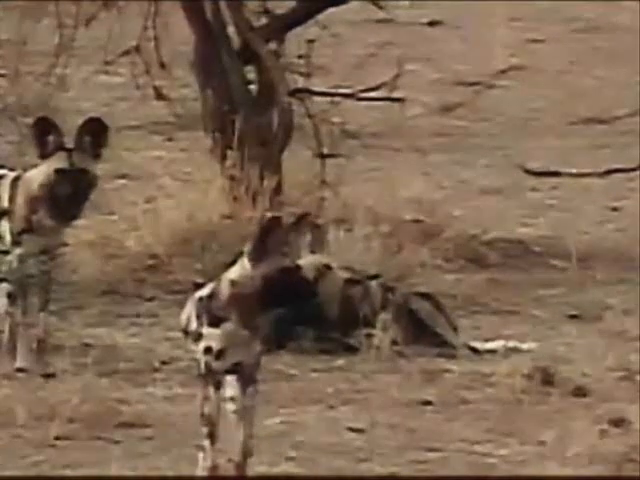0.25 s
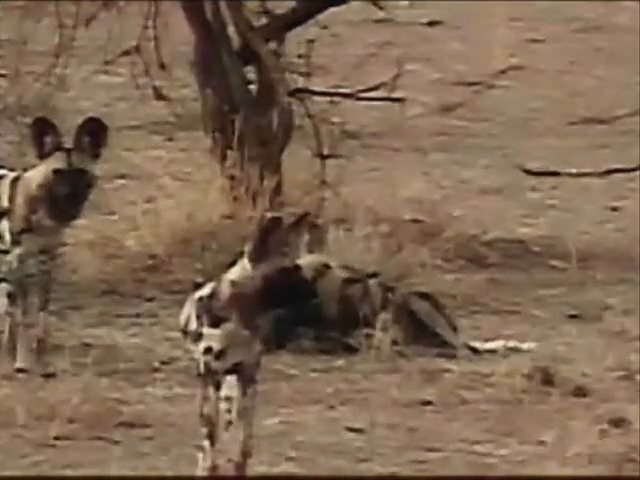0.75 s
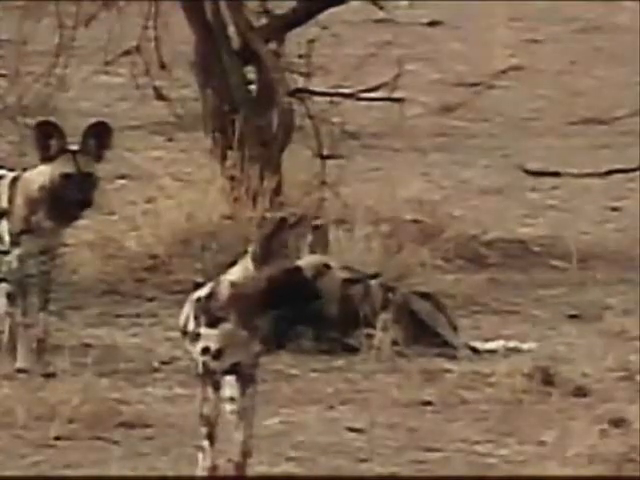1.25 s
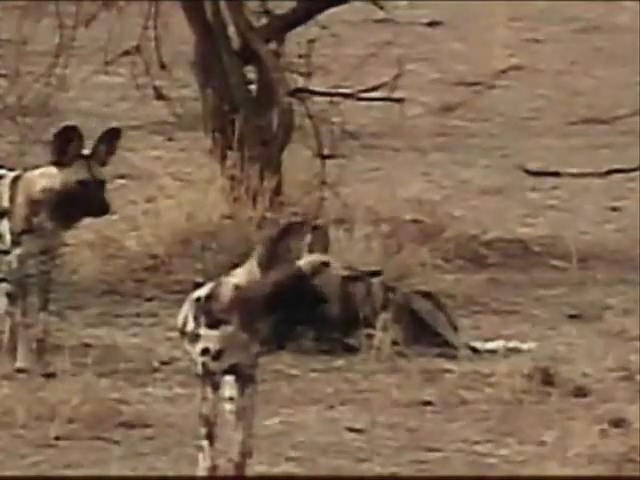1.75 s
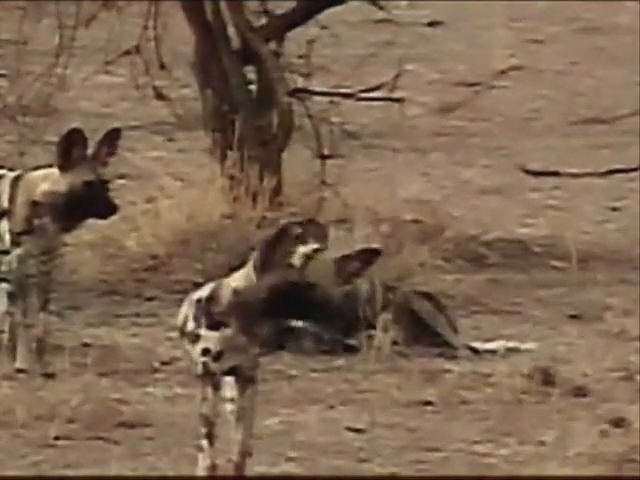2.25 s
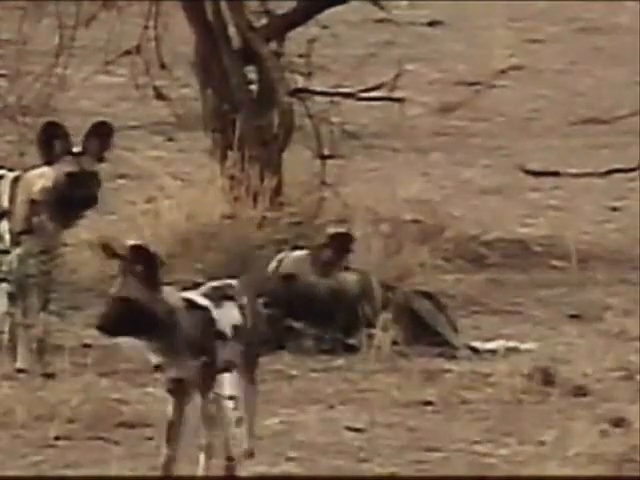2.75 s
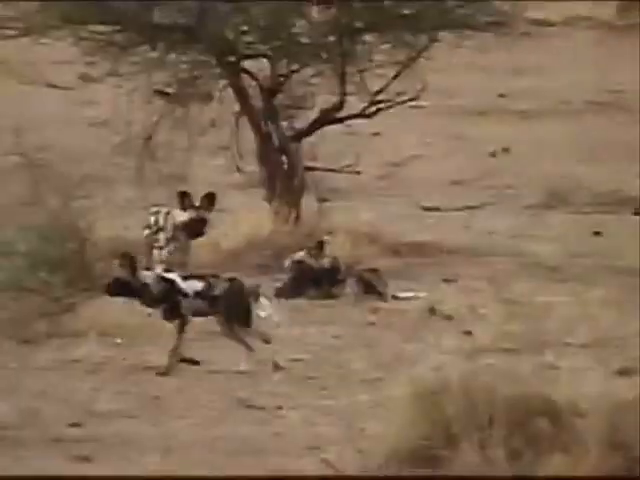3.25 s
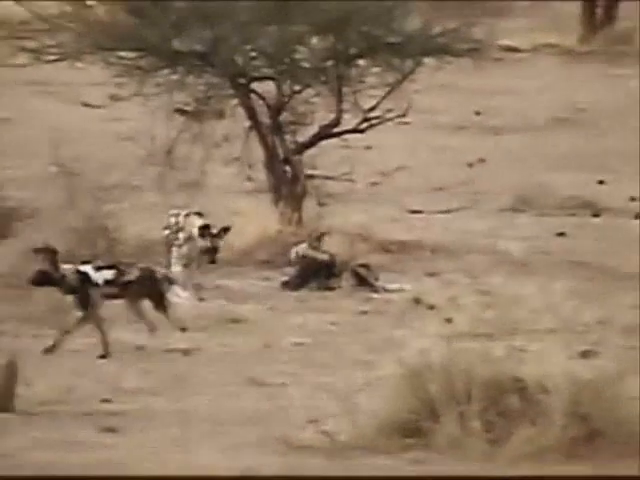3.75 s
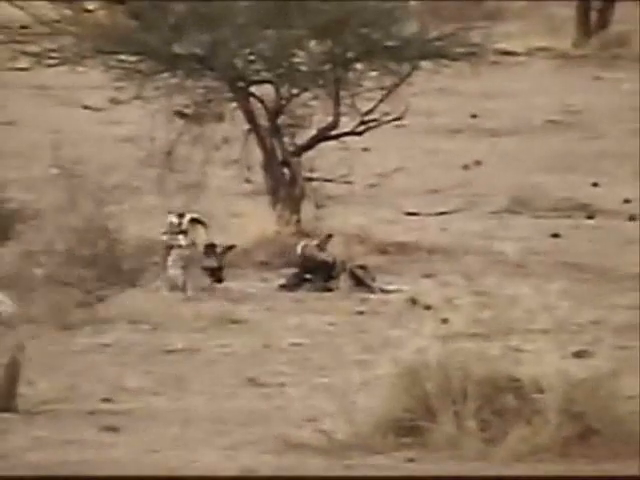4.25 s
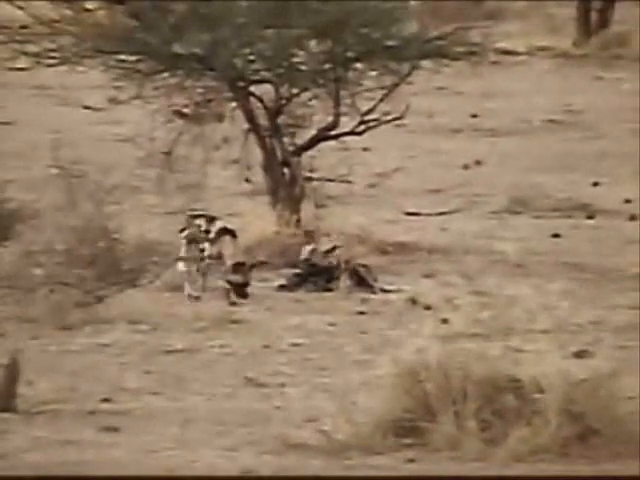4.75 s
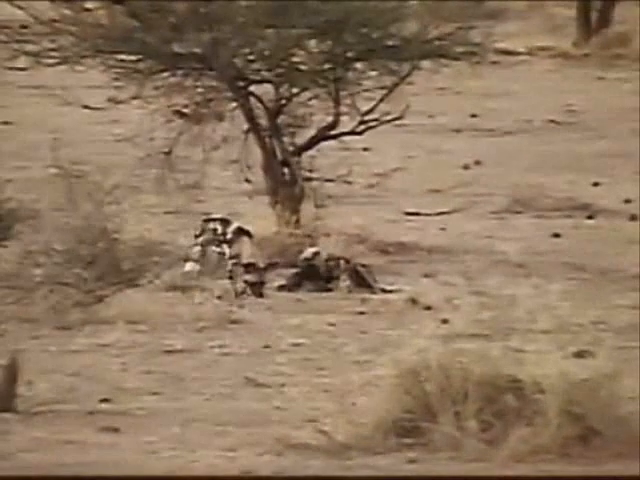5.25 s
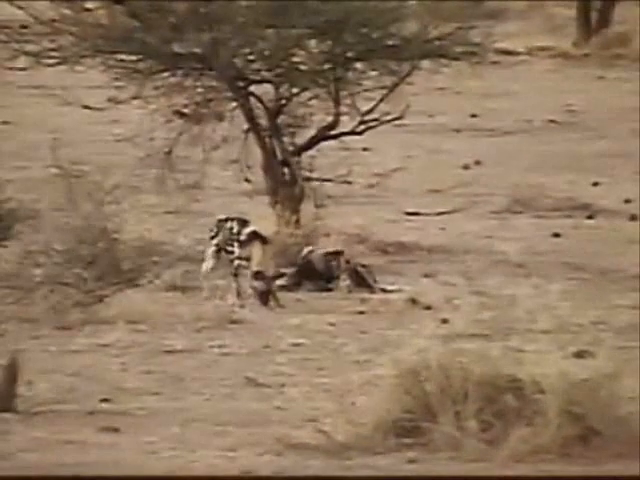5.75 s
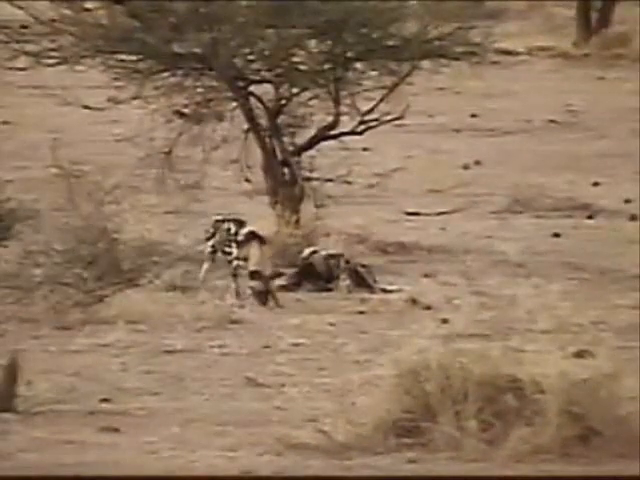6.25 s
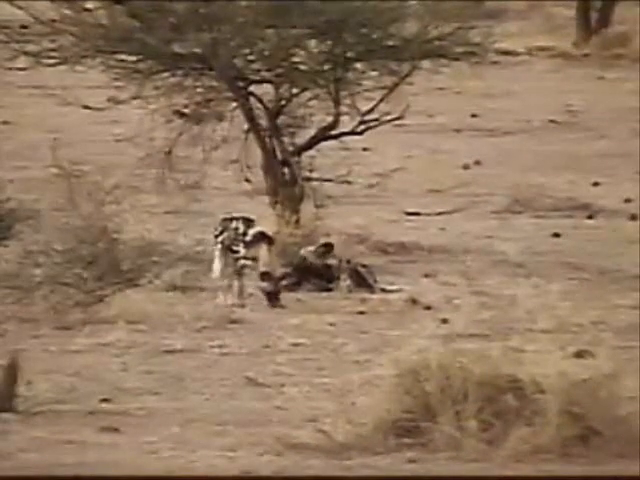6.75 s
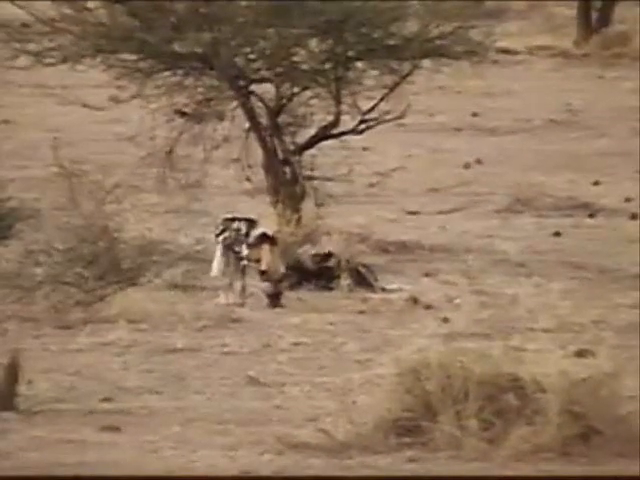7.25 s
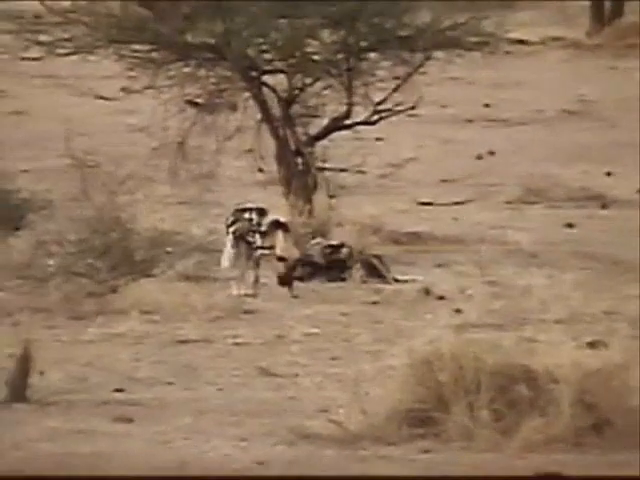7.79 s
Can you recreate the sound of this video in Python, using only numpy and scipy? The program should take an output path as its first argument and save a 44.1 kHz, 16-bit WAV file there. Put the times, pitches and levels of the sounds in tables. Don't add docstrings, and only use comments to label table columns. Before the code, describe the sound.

High-pitched yips, gliding whistles and even chipping from a wild dog pack, loud and slightly distorted at peaks, thinning to faint calls in wind.

```python
import sys
import numpy as np
from scipy import signal
from scipy.fft import rfft, irfft, next_fast_len
from scipy.io import wavfile
from scipy.ndimage import uniform_filter1d, minimum_filter1d, map_coordinates

SR = 44100
rng = np.random.default_rng(int(sys.argv[2]) if len(sys.argv) > 2 else 0)


def digitize_waveform(pressure):
    field = np.atleast_2d(pressure).T
    bounded = np.clip(field, -1, 1)
    quanta = np.round(bounded * 32767).astype(np.int16)
    wavfile.write(sys.argv[1], SR, quanta)


def boost_factor(decibels):
    exponent = np.asarray(decibels, float) / 20
    return 10 ** exponent


N = 353682
T = np.arange(N) / SR

# middle [t/s], start [f/Hz], end [f/Hz], peak [level/dB]
YIPS = [(0.187, 1830, 1910, -27), (.207, 2060, 2480, -20.5), (.293, 2480, 2540, -13),
        (.314, 2605, 2475, -14.5), (0.819, 2006, 2720, -18.5), (1.12, 2130, 2870, -20.5),
        (.824, 1645, 1690, -13), (1.188, 2175, 2160, -13.5), (1.113, 1775, 2240, -20.5),
        (1.206, 2215, 2270, -16), (1.27, 1674, 2010, -19.5), (1.727, 2820, 3070, -28),
        (1.859, 1920, 1960, -17.5), (1.89, 2010, 2100, -17), (2.933, 2454, 3260, -21.5),
        (2.957, 1533, 1770, -19.5), (5.011, 1534, 1760, -11), (5.07, 2043, 2310, -6.5),
        (1.541, 2740, 2820, -6), (5.411, 2490, 2660, -13), (5.969, 1894, 1850, -16),
        (6.073, 2380, 2600, -24), (7.657, 1820, 2200, -32.5)]
# middle [t/s], start [f/Hz], end [f/Hz], peak [level/dB]
PIPS = [(1.076, 1580, 1640, -18), (1.086, 1604, 1660, -13.5), (1.095, 1690, 1720, -13),
        (1.124, 2590, 2836, -11), (1.181, 2567, 2550, -5.5), (1.187, 2610, 2540, -6.5),
        (1.197, 2535, 2540, -7), (1.203, 2555, 2480, -10), (1.21, 2475, 2440, -17.5),
        (3.215, 1543, 1694, -7), (3.2445, 2612, 2683, -3.5), (3.2518, 2655, 2600, -8),
        (3.263, 2653, 2560, 0), (3.269, 2535, 2394, -6.5), (1.897, 2802, 2733, -3),
        (3.5745, 2438, 2626, -3.5), (4.411, 2645, 2870, -16), (5.038, 2683, 2704, -7.5),
        (5.0475, 2718, 2750, -2), (5.061, 2672, 2624, -1), (5.968, 1850, 1870, -28.5)]
# middle [t/s], start [f/Hz], end [f/Hz], peak [level/dB]
TWITTERS = [(.455, 1630, 1505, -35.5), (.84, 1620, 1650, -26), (1.164, 1790, 2440, -15.5),
            (1.514, 2880, 2746, -13), (1.544, 2592, 3140, -9.5), (1.879, 2170, 2670, -9.5),
            (1.899, 2926, 2514, -12), (1.913, 2432, 2250, -14.5), (2.035, 2580, 2476, -18.5),
            (2.047, 2810, 2740, -22.5), (2.252, 2950, 3167, -15), (2.307, 2110, 1778, -18.5),
            (2.787, 1860, 1730, -22.5), (3.137, 1496, 1580, -22.5), (3.234, 1727, 2540, -11.5),
            (3.222, 1516, 1900, -10.5), (3.545, 1860, 2170, -24.5), (3.63, 1934, 1457, -31.5),
            (4.411, 2580, 3025, -19.5), (4.424, 2000, 2435, -23.5), (4.737, 2425, 2930, -22.5),
            (4.797, 2470, 2675, -8), (4.927, 2536, 2610, -18), (5.202, 2700, 2240, -25),
            (5.027, 1833, 2274, -21.5), (5.286, 2710, 2700, -22), (5.493, 2924, 2610, -28.5),
            (7.866, 2508, 3030, -28), (7.92, 1480, 1680, -23.5), (7.95, 2297, 2280, -26)]
# middle [t/s], start [f/Hz], end [f/Hz], peak [level/dB]
SQUEALS = [(.4, 1076, 1260, -44), (1.39, 1946, 2120, -31), (7.803, 2600, 2340, -32),
           (.428, 2558, 2560, -30), (1.533, 2279, 2817, -9), (1.79, 1850, 2025, -30.5),
           (2.276, 3020, 2508, 0.5), (2.292, 2790, 2043, -11), (2.472, 2680, 3120, -27.5),
           (2.733, 2696, 2475, -23.5), (2.829, 1582, 1614, -21.5), (2.939, 2520, 2860, -18),
           (3.113, 1687, 1698, -12), (3.173, 2438, 3225, -13), (3.275, 2017, 2580, -20),
           (3.505, 2390, 2920, -25.5), (4.765, 1230, 1790, -26), (4.813, 2410, 2400, -39),
           (5.43, 2600, 2483, -24.5), (6.073, 1530, 1583, -25.5), (6.19, 1678, 2376, -26),
           (7.148, 1574, 1660, -30.5)]
# middle [t/s], length [t/s], start [f/Hz], end [f/Hz], peak [level/dB]
WHINES = [(1.082, .1, 1500, 1800, -14), (1.14, .05, 1608, 1910, -23), (2.429, .08, 2820, 2800, -23),
          (2.982, 0.072, 1750, 2980, -26), (4.398, .05, 1490, 2060, -36), (5.045, 0.1, 2660, 3510, -24.5),
          (3.575, .06, 2852, 2804, -11), (4.322, .07, 1746, 2027, -30), (5.053, .08, 2647, 2483, -16.5),
          (4.693, 0.1, 818, 1100, -50), (3.53, 0.055, 2600, 2820, -26), (3.59, .037, 2654, 2998, -4),
          (6.186, .08, 1830, 2653, -33), (7.638, .08, 2370, 2670, -27), (7.694, .09, 3010, 2585, -30.5),
          (7.907, .08, 2770, 2770, -30.5), (7.956, .06, 2450, 2640, -24.5)]
# middle [t/s], start [f/Hz], end [f/Hz], peak [level/dB]
ANSWERS_EARLY = [(0.162, 2096, 1808, -34), (0.225, 2754, 2630, -26), (0.235, 2611, 2200, -28),
                 (0.365, 1730, 1610, -32), (0.427, 2583, 2620, -28.5), (0.475, 1686, 1590, -35.5),
                 (0.551, 2940, 2840, -28), (0.595, 3080, 2710, -33), (0.868, 2780, 2540, -36),
                 (0.888, 2660, 2570, -31), (0.976, 1660, 1680, -30), (1.145, 2710, 2860, -28),
                 (1.222, 2486, 2590, -20.5), (1.291, 2740, 2760, -27.5), (1.473, 3060, 2710, -33),
                 (1.676, 3050, 2685, -35), (1.7, 2940, 2810, -28), (1.764, 2860, 2842, -41),
                 (1.824, 1910, 1900, -34.5), (2.339, 2810, 2740, -14), (2.395, 2754, 2890, -23.5),
                 (2.464, 1630, 1620, -33), (2.694, 2820, 2630, -29), (2.738, 1364, 1722, -35),
                 (2.766, 2570, 3020, -29), (2.786, 2970, 2650, -32), (2.917, 1960, 2010, -29.5),
                 (2.995, 2445, 2485, -24), (3.013, 1720, 1750, -35), (3.075, 2635, 2540, -32),
                 (3.081, 1503, 1690, -27), (3.157, 2035, 2000, -24), (3.177, 1630, 1560, -17),
                 (3.203, 2493, 2890, -15), (3.3, 2570, 2710, -27), (3.31, 2520, 2500, -31),
                 (3.336, 2700, 2570, -40), (3.394, 2660, 2583, -35.5), (3.42, 2520, 2583, -33),
                 (3.476, 2440, 2570, -26.5), (3.624, 2310, 2750, -24.5), (3.658, 2810, 2880, -38)]
# middle [t/s], start [f/Hz], end [f/Hz], peak [level/dB]
ANSWERS_LATE = [(3.716, 2936, 2860, -28.5), (3.753, 2806, 2960, -33), (4.075, 2470, 2590, -28.5),
                (4.131, 2670, 2454, -32.5), (4.348, 1780, 2210, -31), (4.376, 2320, 2760, -27),
                (4.475, 2360, 2799, -30), (4.502, 2800, 2655, -36.5), (4.672, 1904, 1925, -35.5),
                (4.727, 2014, 2080, -30), (4.741, 1705, 1630, -28), (4.743, 3090, 2810, -25),
                (4.781, 1840, 2240, -31), (4.903, 2627, 2530, -31.5), (4.986, 1550, 1696, -29),
                (5.107, 2500, 2500, -26), (5.14, 2100, 1870, -24), (5.172, 2650, 2570, -24),
                (5.199, 1683, 1480, -28), (5.22, 2730, 2640, -21.5), (5.274, 2400, 2575, -22),
                (5.326, 2770, 2850, -30.5), (5.34, 2220, 2050, -29), (5.384, 2660, 2552, -20.5),
                (6.098, 2560, 2570, -30), (6.112, 1630, 2260, -42), (6.132, 2554, 2530, -27.5),
                (6.15, 2765, 2836, -30.5), (6.206, 2280, 2470, -31), (6.882, 1833, 2050, -32),
                (6.923, 1830, 1666, -31), (7.024, 1556, 1545, -37), (7.332, 2695, 2550, -31.5),
                (7.394, 1643, 1620, -37.5), (7.593, 2800, 2780, -36.5), (7.595, 2430, 2410, -34.5),
                (7.657, 1980, 2020, -34.5), (7.708, 1960, 1890, -34.5), (7.747, 2420, 2530, -36),
                (7.868, 2184, 2020, -30), (7.892, 1986, 1770, -30), (7.96, 2505, 2540, -25)]
# middle [t/s], peak [level/dB]
CHIP_TRAINS = [(0.117, -30), (0.176, -34), (0.24, -30), (0.31, -27), (0.387, -26), (0.543, -28.5),
               (1.262, -19.5), (1.315, -20.5), (1.382, -23), (1.448, -25), (1.52, -20.5), (1.592, -18.5),
               (1.727, -36), (1.859, -27), (1.928, -28), (2.004, -28.5), (2.077, -27), (2.159, -25),
               (2.239, -29), (2.315, -26), (2.34, -31), (2.887, -27.5), (2.935, -27.5), (3.001, -28.5),
               (3.062, -27.5), (3.131, -25), (3.284, -31), (3.353, -28.5), (3.416, -27), (3.488, -27.5),
               (3.559, -24.5), (3.634, -23), (3.873, -25), (3.935, -22.5), (4.003, -23), (4.075, -24.5),
               (4.148, -19), (4.662, -24), (4.721, -22), (4.757, -32.5), (4.786, -22), (4.853, -18),
               (4.881, -35.5), (4.928, -16), (4.962, -32), (4.997, -20.5), (5.383, -34), (5.494, -30.5),
               (7.258, -32), (7.296, -28), (7.372, -28), (7.411, -25.5), (7.445, -32), (7.542, -23.5),
               (7.614, -20), (7.688, -26)]
# middle [t/s], length [t/s], pitch [f/Hz], peak [level/dB]
SINGLE_CHIPS = [(0.956, .04, 3297, -31), (5.143, .025, 3600, -31.5), (1.794, 0.014, 3663, -34),
                (.467, 0.043, 3584, -19), (0.756, 0.03, 3550, -18.5), (0.825, 0.025, 3330, -8.5),
                (1.666, 0.0047, 3515, -8), (1.673, 0.01, 3486, -12.5), (2.616, 0.037, 3325, -28),
                (2.783, 0.023, 3628, -14.5), (2.847, 0.04, 3556, -16.5), (3.204, .025, 3470, -20.5),
                (3.714, 0.024, 3530, -13), (3.73, .016, 3583, -20.5), (3.766, .016, 3624, -21),
                (3.797, 0.038, 3624, -24.5), (4.615, 0.015, 3557, -14), (5.235, 0.049, 3200, -34.5),
                (6.92, 0.027, 3554, -14.5), (6.938, 0.026, 3580, -30.5), (7.195, 0.016, 3637, -19.5),
                (7.345, .022, 3560, -13), (7.49, 0.033, 3400, -24), (7.491, 0.022, 3600, -23)]
# [t/s], [level/dB]
EXCITEMENT = [(0, -35), (.6, -43), (.8, -35), (.95, -41.5), (1.15, -32), (1.55, -36), (2.4, -41),
              (2.55, -42.5), (2.75, -34), (3.65, -38), (4.55, -42.5), (5.05, -30), (5.5, -35.5), (5.8, -41),
              (6.1, -36.5), (6.25, -43.5), (7.5, -39), (7.62, -39.5)]
# middle [t/s], width [t/s], peak [level/dB]
OUTBURSTS = [(.27, 0.31, -48), (1.15, 0.13, -41.5), (1.75, 0.21, -51.5), (2.4, 0.043, -44.5),
             (2.78, 0.056, -36), (3.22, .14, -35.5), (4.4, 0.047, -37.5), (5.05, 0.22, -34.5),
             (6.15, 0.2, -43), (6.95, 0.35, -54.5), (7.75, 0.13, -43.5)]
# [f/Hz], [level/dB per Hz]
FAR_COLOUR = [(590, -49.5), (1000, -31.5), (1410, -18), (1590, -8), (2020, -7.5), (2290, -9.5),
              (2480, -1.5), (2810, 0.5), (3130, -7), (3490, -4.5), (3690, -8.5), (3850, -21), (3970, -30.5),
              (4120, -72.5), (4300, -78), (5590, -106), (9460, -120)]
# [f/Hz], [level/dB]
OVERTONE_COLOUR = [(3950, -45.5), (4200, -14.5), (4550, -21), (4800, -17.5), (5200, -10), (5600, 1.5),
                   (5950, -4.5), (6400, -25), (7200, -31), (8200, -14.5), (9500, -29.5), (10800, -20.5),
                   (12000, -75.5)]
# [t/s], peak [level/dB], knock [f/Hz]
PAW_TAPS = [(0.626, -57.5, 1250), (2.117, -61.5, 1150), (2.414, -46.5, 1270), (4.708, -52.5, 1010),
            (5.066, -50, 1006), (5.131, -44.5, 1116), (5.198, -49.5, 657), (5.265, -47, 652),
            (5.33, -48.5, 1244), (5.401, -45, 1210), (5.473, -49, 645), (5.528, -53.5, 450),
            (7.775, -54.5, 1160)]
# middle [t/s], width [t/s], [level/dB]
SCUFFLES = [
    (4.97, .05, -63.5),
    (5.38, 0.24, -62),
]
# middle [t/s], width [t/s], panel [level/dB], rumble [level/dB]
GUSTS = [(1.58, 0.09, -51.5, -62.5), (1.771, 0.2, -60.5, -65), (1.97, 0.086, -57.5, -71.5),
         (2.2, 0.15, -47.5, -62), (2.6, .06, -59.5, -66.5), (3.3, 0.18, -79, -73),
         (3.95, 0.096, -61.5, -61.5), (4.8, 0.099, -48.5, -63.5), (5, 0.11, -56.5, -62),
         (5.2, .2, -74.5, -71.5), (5.72, 0.15, -73, -61), (6.2, 0.33, -77, -75), (7.3, .6, -76, -75.5)]
# [f/Hz], [level/dB per Hz]
RUMBLE_COLOUR = [(62, -37.5), (90, -1), (105, -11), (120, 7.5), (135, -10), (160, -3), (250, -13.5),
                 (380, -10), (700, -89)]
# [f/Hz], [level/dB per Hz]
AIR_COLOUR = [(120, -51), (200, -17), (477, -11), (532, -14), (875, -13), (1400, -7), (1500, -7),
              (1950, -28.5), (3300, -120)]
# [f/Hz], [level/dB per Hz]
HISS_COLOUR = [(3900, -13), (4500, -9.5), (5400, -7), (6000, -7.5), (6500, -11), (8000, -16.5),
               (10000, -24), (12000, -59)]
# [t/s], [level/dB]
COO_LEVEL = [(0, -70.5), (.7, -69.5), (.85, -59), (1.6, -77), (5.7, -77.5), (5.8, -55.5), (6, -68),
             (6.9, -72.5), (8.02, -81)]

YIP_S, PIP_S, TWITTER_S, SQUEAL_S, ANSWER_S = .016, .0092, .038, .043, .028
LEAN = 0.94
NEAR_LEVEL = .2
NEAR_ROUGH, FAR_ROUGH = .55, 2.1
CHIP_S, CHIP_HZ, CHIP_FALL_HZ, CHIP_SCATTER_HZ = .024, 3600, 128, 25
SLAP_S, SLAP_DB = .021, -19
CLOSE_DB, CLOSE_T60_S = -9, .06
MURMUR_DB = -46
CALM_PANEL_DB, CALM_RUMBLE_DB = -92, -71.5
HISS_DB, HISS_SWAY_DB = -70, 1.5
SKIP_AT_S, SKIP_END_S, SKIP_BACK_S = 6.2479, 6.872, .63474


def pack():
    flutter = boost_factor(3.4 * np.tanh(wobble(260)) - .3)
    voices = whistles(flutter)
    ticks = chips() * flutter ** .35
    near = voices + ticks
    closeness = nearness(near)
    shimmer = unit(0.65 + wobble(260)) * boost_factor(3.0 - 8.5 * closeness)
    deep = swells(OUTBURSTS, MURMUR_DB) * crowd(1000, 2373.0, count=2600)
    high = curves(EXCITEMENT)[0] * crowd(2202.0, 3900, count=2600)
    far = filtered(deep, [(2200, 1.0), (2500, -16.5)])
    far += filtered(high, [(2100, -13.0), (2400, -1.0)])
    calls = boost_factor(-2.5 - 3 * (1 - closeness)) * voices + boost_factor(-3.5) * ticks
    calls += boost_factor(CLOSE_DB) * scattered(near * shimmer, t60=CLOSE_T60_S)
    calls += boost_factor(-7) * scattered(near * shimmer, t60=0.21)
    calls += boost_factor(-0.6) * far
    return filtered(calls, [(3750, 0.25), (3950, -9.5), (4150, -61.0)])


def whistles(flutter):
    brief_kinds = [(YIPS, YIP_S), (PIPS, PIP_S)]
    long_kinds = [(TWITTERS, TWITTER_S), (SQUEALS, SQUEAL_S), (ANSWERS_EARLY + ANSWERS_LATE, ANSWER_S)]
    brief = glides(with_lengths(brief_kinds))
    long = glides(with_lengths(long_kinds) + WHINES)
    roughness = np.interp(nearness(long), [.1, .7], [FAR_ROUGH, NEAR_ROUGH])
    return brief + long * flutter ** roughness


def with_lengths(kinds):
    return [(s, length, *rest) for calls, length in kinds for s, *rest in calls]


def chips():
    trains = [(s, CHIP_S, CHIP_HZ + CHIP_SCATTER_HZ * rng.standard_normal(), db) for s, db in CHIP_TRAINS]
    half_fall = CHIP_FALL_HZ / 2
    rows = [(s, length, hz + half_fall, hz - half_fall, db) for s, length, hz, db in trains + SINGLE_CHIPS]
    direct = glides(rows)
    return direct + boost_factor(SLAP_DB) * np.roll(direct, round(SLAP_S * SR))


def glides(rows):
    out = np.zeros(N + SR)
    turns = rng.random((len(rows), 1))
    for (s, length, hz0, hz1, db), turn in zip(rows, turns):
        u = np.arange(round(length * SR)) / (length * SR)
        phase = length * (hz0 * u + (hz1 - hz0) * u ** 2 / 2) + turn
        swell = boost_factor(db) * np.sin(np.pi * u ** LEAN) ** 2
        start = round((s - length / 2) * SR) + SR // 2
        out[start:][:len(u)] += swell * np.sin(2 * np.pi * phase)
    return out[SR // 2:][:N]


def nearness(x):
    swell = uniform_filter1d(np.abs(x), size=500) * np.pi / 2
    return swell / (swell + NEAR_LEVEL)


def crowd(lo_hz, hi_hz, count):
    a = rng.random((count, 5))
    s = 8.3 * a[:, 0] - .28
    length = .008 + .022 * a[:, 1]
    hz = lo_hz + (hi_hz - lo_hz) * a[:, 2]
    far = glides(np.c_[s, length, hz - 350 * a[:, 3], hz + 550 * a[:, 3] - 100, 5 * a[:, 4]])
    wash = unit(rng.standard_normal(N))
    echoed = unit(0.63 * far + scattered(far, t60=0.52))
    return unit(filtered(echoed + wash, FAR_COLOUR))


def scattered(x, t60):
    t = np.arange(SR // 3) / SR
    size = SR // 4
    padded, out = np.pad(x, size), np.zeros(N + 2 * SR)
    for i in range(0, N + size, size // 2):
        tail = boost_factor(-60 * t / t60) * rng.standard_normal(len(t))
        piece = padded[i:i + size]
        faded = piece * np.hanning(size)[:len(piece)]
        wet = signal.fftconvolve(faded, tail / np.linalg.norm(tail))
        out[i:i + len(wet)] += wet
    return out[size:][:N]


def overdriven(x):
    swell = np.abs(signal.hilbert(x, next_fast_len(N))[:N])
    x = x / (1 + (swell / .8) ** 6) ** (1 / 6)
    deep = filtered(x, [(3050, -1.15), (3300, -29.0)])
    drive = (x + deep) / 2
    bent = boost_factor(-6.0) * drive ** 2 + boost_factor(-10.5) * drive ** 3 + boost_factor(-17) * drive ** 4
    over = filtered(bent, OVERTONE_COLOUR)
    body = uniform_filter1d(np.abs(deep), size=2500)
    fizz = boost_factor(-41.5) * body * unit(filtered(rng.standard_normal(N), OVERTONE_COLOUR))
    return x + over + boost_factor(-1.0) * scattered(over, t60=0.056) + fizz


def paws():
    out, t = np.zeros(N + SR), np.arange(SR // 20) / SR
    for s, db, hz in PAW_TAPS:
        puff = signal.lfilter([.25], [1, -.8], rng.standard_normal(len(t)))
        decay = boost_factor(db + 4.5 - 60 * t / 0.054)
        out[round(s * SR):][:len(t)] += decay * (0.71 * np.sin(2 * np.pi * hz * t) + 2.5 * puff)
    steps = filtered(out[:N], [(150, -38.5), (350, -4.0), (2000, 9.5), (3600, -7.5), (4100, -72.0)])
    dust = filtered(rng.standard_normal(N), [(250, -40), (400, -0.5), (700, 0.5), (1200, -2), (1600, -39.5)])
    steps += swells(SCUFFLES, -95.5) * unit(dust) * boost_factor(2.0 * wobble(35))
    return steps + boost_factor(-3) * scattered(steps, t60=.35)


def wind():
    drum = swells([(s, width, db) for s, width, db, _ in GUSTS], CALM_PANEL_DB)
    rumble = swells([(s, width, db) for s, width, _, db in GUSTS], CALM_RUMBLE_DB)
    panel = np.sqrt(2) * sine(46 + 2.5 * wobble(9)) * boost_factor(1.2 * wobble(8))
    drumming = drum * (panel + 0.1 * panel ** 2 - .12)
    noise = rng.standard_normal((3, N))
    rumbling = (rumble + boost_factor(-22) * drum) * unit(filtered(noise[0], RUMBLE_COLOUR))
    air = boost_factor(-61.5 + 0.52 * wobble(0.47)) * unit(filtered(noise[1], AIR_COLOUR))
    hiss = boost_factor(HISS_DB + HISS_SWAY_DB * wobble(19.0)) * unit(filtered(noise[2], HISS_COLOUR))
    coo = curves(COO_LEVEL)[0] * sine(489 + 6 * wobble(30)) * boost_factor(4 * wobble(25) - 3.5)
    return drumming + rumbling + air + hiss + coo


def sine(hz):
    return np.sin(2 * np.pi * np.cumsum(hz) / SR)


def swells(rows, calm_db):
    s, width, db = np.transpose(rows)[..., None]
    return boost_factor(calm_db) + (boost_factor(db) * np.exp(-((T - s) / width) ** 2)).sum(axis=0)


def curves(rows):
    s, *columns = np.transpose(rows)
    return [boost_factor(np.interp(T, s, column)) for column in columns]


def wobble(rate):
    return map_coordinates(rng.standard_normal(int(N * rate / SR) + 4), [T * rate])


def filtered(x, points):
    m = next_fast_len(N + 8192)
    f, db = np.transpose(points)
    log_hz = np.log(np.fft.rfftfreq(m, 1 / SR) + 1)
    gain = boost_factor(np.interp(log_hz, np.log(f), db))
    return irfft(rfft(x, m) * gain, m)[..., :N]


def unit(x):
    return x / np.sqrt(np.mean(x ** 2) + 1e-20)


def scene():
    mid = overdriven(pack()) + wind() + paws()
    late = np.roll(mid, SR // 12)
    side = boost_factor(-27) * filtered(late, [(30, 3.5), (250, -1.5), (600, -10.5), (1000, -40), (1500, -59.0)])
    return np.array([mid + side, mid - side])


def thinned(x, keep_db):
    hz, _, z = signal.stft(x, SR, nperseg=2048)
    band = 12
    power = np.abs(z[0]) ** 2
    blocks = power[:1020].reshape(-1, band, z.shape[2])
    level = 10 * np.log10(blocks.mean(axis=1) + 1e-20)
    chip = 10 * np.log10(power[(hz > 3300) & (hz < 3850)].mean(axis=0) + 1e-20)
    chip = -minimum_filter1d(-chip, size=4, origin=-1)
    chance = uniform_filter1d(rng.standard_normal(level.shape), size=4, axis=1)
    band_hz = np.arange(len(level)) * band * hz[1]
    slope = np.interp(band_hz, [4000, 5200, 6500, 9000], [5, -2, -4, -10])[:, None]
    strong_band = level > keep_db + slope + .6 * (chip + 62) + 8 * chance
    strong_bin = power[:1020] > boost_factor(2 * keep_db + 2 + .5 * (chip + 62))
    strong = np.repeat(strong_band, band, axis=0) & strong_bin
    keep = (hz[:, None] < 3900) | np.pad(strong, ((0, 5), (0, 0)))
    return signal.istft(z * keep, SR, nperseg=2048)[1][:, :N]


def band_limit(x):
    return signal.sosfilt(signal.butter(12, 15500, fs=SR, output="sos"), x)


def record(dry):
    dry = thinned(dry, keep_db=-103)
    replay = (T >= SKIP_AT_S) * np.clip((SKIP_END_S - T) / .01, 0, 1)
    earlier = np.roll(dry, round(SKIP_BACK_S * SR), axis=1)
    mix = (1 - replay) * dry + replay * earlier + .0047
    mix[:, round(SKIP_AT_S * SR)] += boost_factor(-28)
    return band_limit(mix)


dry = scene()
out = record(dry)
digitize_waveform(out)
```